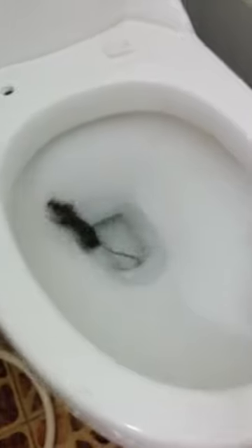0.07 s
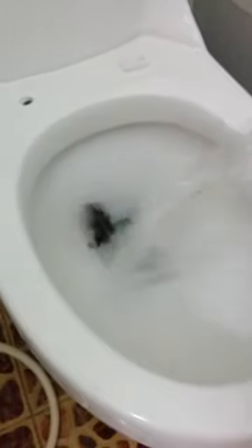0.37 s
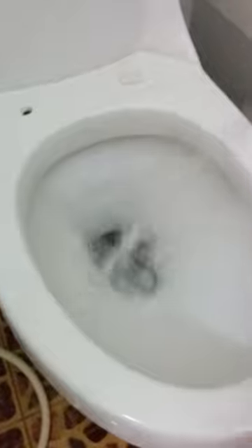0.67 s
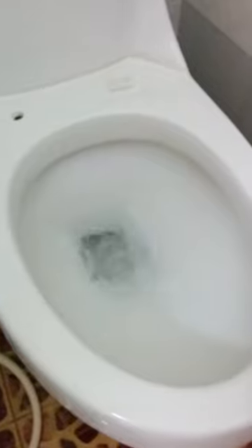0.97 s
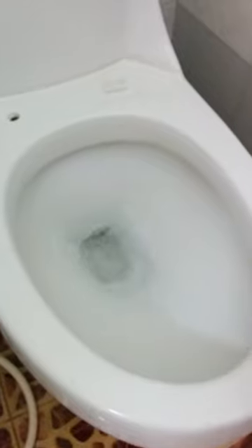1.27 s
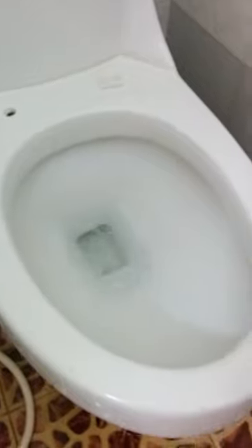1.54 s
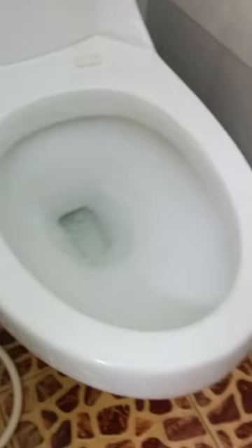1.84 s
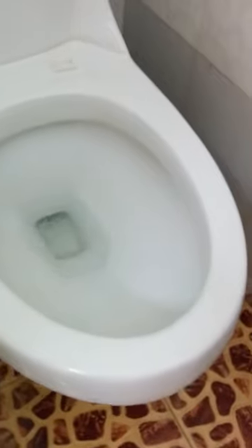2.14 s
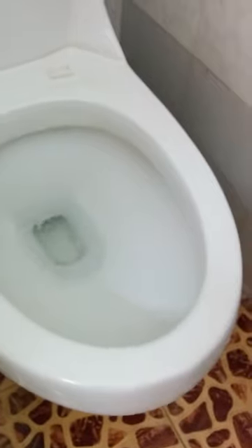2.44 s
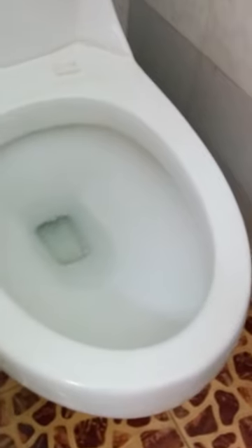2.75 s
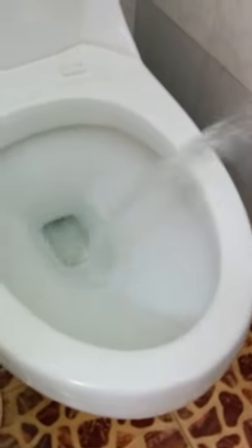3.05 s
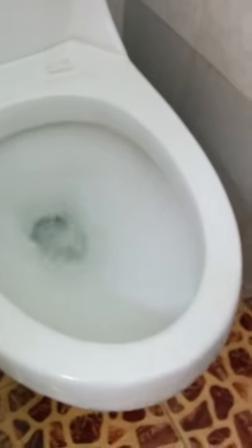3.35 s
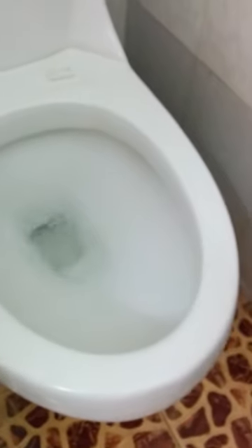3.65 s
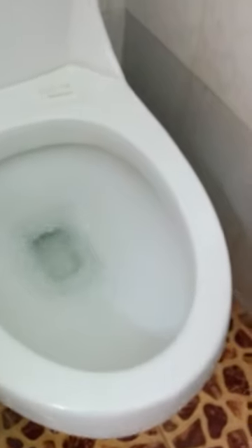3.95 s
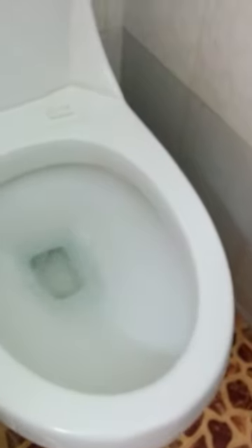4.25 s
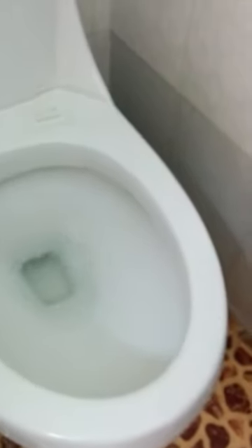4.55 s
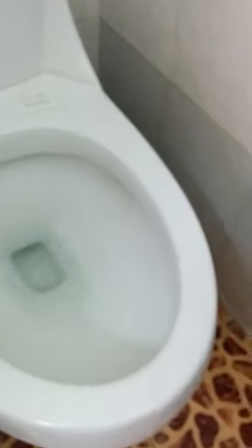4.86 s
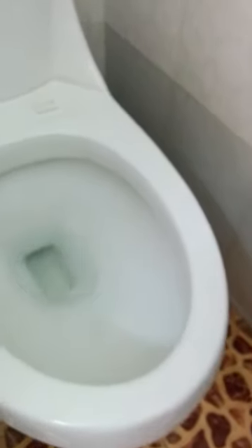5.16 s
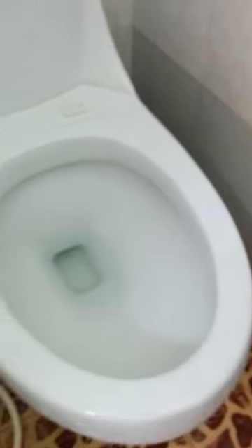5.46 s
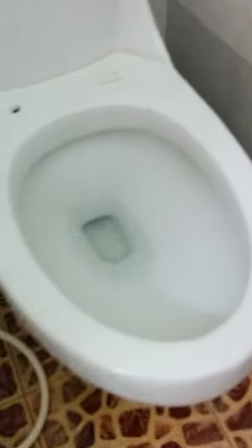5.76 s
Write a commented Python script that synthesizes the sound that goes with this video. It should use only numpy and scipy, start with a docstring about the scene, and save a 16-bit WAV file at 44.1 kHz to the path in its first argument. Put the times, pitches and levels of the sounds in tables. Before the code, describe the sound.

Two splashes of water gurgle down a toilet bowl in a tiled bathroom before a plastic bucket squeaks, falls and clatters.

```python
"""Water thrown twice from a plastic bucket into a toilet bowl; the trap gurgles and drips after each pour.
The water is heard as swarms of ringing bubbles, with spray ticking on the porcelain. The bucket's handle
squeaks and scrapes in its lugs; then the bucket is dropped, knocks a few times and lands with a hollow
clatter. Small tiled bathroom, one hand-held mono microphone in the room with the bowl: it takes in
the ring of the tiles and adds a soft low rumble as it is moved about."""
import sys
import numpy as np
from scipy import signal
from scipy.fft import rfft, irfft, next_fast_len
from scipy.io import wavfile
from scipy.ndimage import uniform_filter1d, map_coordinates

SR = 44100
rng = np.random.default_rng(int(sys.argv[2]) if len(sys.argv) > 2 else 0)


def output_pcm(signal):
    """Save a mono or channel-first signal as 16-bit PCM at the path in sys.argv[1].

    Samples are clipped to [-1, 1] before scaling.
    """
    pcm = np.clip(np.atleast_2d(signal).T, -1, 1) * 32767
    wavfile.write(sys.argv[1], SR, np.round(pcm).astype(np.int16))


N = 265482

# reverberation of the tiled room: f/Hz, t60/s
TILE_DECAY = [(100, 1.2), (200, 1.0), (500, 0.87), (1500, .6), (3000, .58), (6000, 0.44), (14000, 0.21)]
# spectra of the room tone and of the microphone's rumble: f/Hz, level/dB
ROOM_TONE_COLOUR = [(60, -23.5), (120, -21), (180, -4.5), (260, -7), (400, -13.5), (750, -10.5),
                    (1500, -20.5), (3000, -21.5), (4500, -29), (10000, -28.5), (16000, -34.5)]
RUMBLE_COLOUR = [(20, -29.5), (35, -27), (52, -17), (68, -0.5), (90, -18), (130, -20), (200, -33.5),
                 (400, -72.5)]
# bumps of the hand-held microphone: t/s, level/dB, half-width/s
MIC_BUMPS = [(.1, -72, .1), (.84, -50, .085), (1.53, -52, 0.043), (1.7, -66.5, .04), (2.02, -50, .055),
             (3.33, -64, .04), (3.52, -59.5, .07), (4.58, -62.5, 0.064), (4.86, -57, 0.041),
             (5.03, -43.5, 0.042), (5.23, -47, 0.043), (5.45, -59.5, .13)]
# drops on the porcelain: t/s, level/dB, f/Hz
DROPS = [(.131, -51, 1200), (.138, -45, 9450), (.21, -46, 11200), (1.229, -27, 9700), (1.39, -51, 11100),
         (1.503, -49, 9000), (1.8, -59, 9064), (2.875, -58.5, 7480), (3.222, -36.5, 12500),
         (3.329, -21.5, 10000), (.464, -32, 10500), (.738, -21, 11500), (.857, -19, 10490),
         (3.662, -31.5, 11000), (3.915, -53, 10450), (4.145, -52, 13900), (4.582, -55, 10870)]
# water settling in the trap: t/s, bubbling/dB, fizz/dB
SETTLING = [(.15, -83, -72), (1.28, -74, -66), (3.79, -64.5, -71.5)]
# spectra of the two pours, the second also of settling water: f/Hz, level/dB
FIRST_COLOUR = [(110, -54.5), (180, -15.5), (221, -25.5), (347, -12), (435, -16), (957, -19), (1070, -1.5),
                (1270, -11.5), (1920, -7), (2270, -6.5), (3070, -1), (4550, -4.5), (5380, -14.5),
                (11200, -13.5), (16000, -25.5)]
SECOND_COLOUR = [(110, -59.5), (180, -6.5), (288, -1), (404, -20), (487, -10), (779, -15), (1110, -0.5),
                 (1270, -16.5), (1370, -6), (1500, -10), (1850, -6.5), (4550, -7), (5490, -13.5),
                 (9280, -10), (16000, -21)]
# throws of water: t/s, rise/s, hold/s, plunge/dB, splash/dB, spray/dB
POURS = [(.458, 0.038, 0.5, -30, -23, -26), (3.213, 0.19, 0.23, -19.5, -16.5, -25)]
# each jet's way down: time to the wall/s, time to the trap/s, first low cut/Hz, last low cut/Hz
JET_PATHS = [(0.06, .134, 2700, 330), (.03, 0.1, 7900, 170)]
# slugs of water landing within a pour: t/s, plunge/dB, splash/dB, spray/dB
SLUGS = [(0.605, -39.5, -14, -24.5), (0.777, -47, -16.5, -27), (.842, -28, -28.5, -29),
         (.892, -41.5, -26.5, -44), (.962, -62, -41, -29), (1.14, -48, -35, -45), (3.292, -40, -23, -29),
         (3.322, -24.5, -15.5, -22.5), (3.403, -41.5, -27.5, -20.5), (3.553, -40, -27, -34),
         (3.642, -45.5, -32.5, -62), (3.664, -63, -57, -46)]
# the bowl's lingering ring: f/Hz, width/Hz, level/dB
BOWL_MODES = [(261, 2.4, 2.5), (1110, 2.7, -9.5)]
# gulps of air in the trap: t/s, level/dB, f/Hz
GULPS = [(.592, -6, 1876), (.612, -5, 3070), (.645, -7.5, 1930), (1.145, -29, 1355), (1.21, -28.5, 1180),
         (1.229, -31, 4020), (1.33, -26, 2087), (1.331, -34.5, 3250), (1.34, -42, 1000),
         (1.345, -46.5, 2140), (1.39, -53, 4030), (1.502, -22, 2280), (1.503, -36, 4070), (1.504, -50, 741),
         (1.518, -23, 2630), (1.545, -29, 2210), (3.251, -27, 3080), (3.295, -16.5, 1100),
         (3.647, -19.5, 2440), (2.835, -58, 3600), (3.815, -45, 3040), (3.865, -56, 4010),
         (3.98, -55, 3724), (4.025, -54.5, 3390), (4.13, -61, 4200)]
# the handle rubbing in its lugs: t/s, length/s, ringing/dB, scraping/dB
HANDLE_RUBS = [(1.641, .2, -77, -95), (4.217, 0.06, -43, -50), (4.242, 0.1, -46, -61),
               (4.358, 0.022, -69, -53)]
# resonances of the handle as it rubs and as it squeaks: f/Hz, level/dB
HANDLE_MODES = [(2595, -53.5), (3203, -57), (3300, -68), (3359, -45), (3424, -66), (3531, -49.5),
                (3644, -56), (3994, -54), (4570, -54.5), (9243, -68)]
SQUEAK_MODES = [(2665, -13.5), (3058, -19), (3424, -20.5)]
# spectra of the handle's scrape, the bucket's rustle and its wall's clack: f/Hz, level/dB
SCRAPE_COLOUR = [(180, -65), (400, -17.5), (660, -2.5), (850, -14), (1150, 0.5), (1330, -10), (1520, 2),
                 (1800, -13), (2000, -4), (2250, -13), (2520, 5), (2870, -14), (3440, -7), (5620, -16),
                 (9490, -15.5), (15000, -24)]
RUSTLE_COLOUR = [(250, -39), (550, -0.5), (1200, -11), (1700, -8.5), (3000, -38.5)]
CLACK_COLOUR = [(410, -28.5), (640, -4), (780, -7.5), (934, -4), (1010, -5), (1350, -0.5), (1600, -9),
                (1820, -6.5), (2130, -6.5), (3070, -2), (4100, -11.5), (4860, -12.5), (5840, -21.5),
                (8880, -19.5), (13700, -26), (16000, -40.5)]
# the bucket being moved about: t/s, length/s, squeak/dB, rustle/dB
SWINGS = [(2.981, .23, -63.5, -69.5), (4.39, 0.065, -76, -64.5), (4.765, 0.083, -80.5, -63.5)]
# blows on the bucket: t/s, clack/dB, clack cut-off/Hz, boom/dB, boom centre/Hz, rattle t60/s
BLOWS = [(4.837, -26.5, 10500, -29, 950, 0.04), (4.951, -34.5, 2700, -40, 915, 0.023),
         (5.018, -33, 4400, -25.5, 431, 0.081), (5.175, -17, 20170, -16, 455.5, 0.07),
         (5.21, -18.5, 18100, -22.5, 470, 0.18), (5.24, -20, 12800, -19, 500, 0.18),
         (5.285, -20, 13600, -15, 580, 0.086), (5.35, -25.5, 9000, -20.5, 482, 0.17),
         (5.441, -33, 3270, -25.5, 402, 0.15), (5.52, -50.5, 2600, -35.5, 535, 0.066),
         (5.586, -64.5, 2390, -56, 520, 0.044), (5.725, -76.5, 2030, -67, 230, .02),
         (5.767, -80.5, 2000, -65, 222, 0.0094)]
# resonances of the bucket and the air in it: f/Hz, width/Hz, level/dB
BUCKET_MODES = [(187.2, 6.8, -1), (204, 3.4, 10), (262, 6.8, 2), (289, 14, -2.5), (330.6, 4, -13),
                (427.3, 9, -2), (489.6, 15, 0), (538, 11, -7), (573, 5.9, 3.5), (626.5, 5.7, 1.5),
                (766, 5, -5.5), (808, 8.3, -5), (940, 5.8, 1), (985, 10, -5.5), (1303, 18, -4.5)]


def amp(db):
    """Decibels to gain."""
    return 10 ** (np.asarray(db) / 20)


def unit(x):
    """Scale to rms 1."""
    return x / np.sqrt(np.mean(x ** 2) + 1e-20)


def unit_hit(x):
    """Scale a hit to rms 1 over its first 50 ms."""
    return x / np.sqrt(np.mean(x[:SR // 20] ** 2) + 1e-20)


def along(points, hz):
    """Read (f/Hz, value) points on a log frequency axis."""
    f, values = np.transpose(points)
    return np.interp(np.log(hz + 1), np.log(f + 1), values)


def add(track, s, x):
    """Mix x into the track from time s."""
    part = track[max(0, round(s * SR)):][:len(x)]
    part += x[:len(part)]


def filtered(x, response):
    """Filter x by a function of frequency."""
    size = next_fast_len(len(x) + SR // 2)
    return irfft(rfft(x, size) * response(np.fft.rfftfreq(size, 1 / SR)), size)[:len(x)]


def noise(colour, size):
    """Coloured noise of rms 1."""
    return unit(filtered(rng.standard_normal(size), lambda hz: amp(along(colour, hz))))


def resonate(x, modes):
    """Pass x through (f/Hz, width/Hz, level/dB) resonances."""
    return filtered(x, lambda f: sum(amp(db) * 1j * f * width / (hz * hz - f * f + 1j * f * width)
                                     for hz, width, db in modes))


def room(x, wet_db, life=1):
    """Direct sound plus a tail off the tiles; life scales the decay time."""
    hz, t, spectra = signal.stft(rng.standard_normal(SR), SR, nperseg=256)
    t60 = life * along(TILE_DECAY, hz)[:, None]
    tail = signal.istft(spectra * amp(-60 * t / t60), SR, nperseg=256)[1]
    return x + amp(wet_db) * signal.fftconvolve(x, tail / np.linalg.norm(tail))[:len(x)]


def room_tone():
    """The bathroom's faint hiss, wavering in patches of time and frequency."""
    spectra = signal.stft(noise(ROOM_TONE_COLOUR, N), nperseg=1024)[2]
    patches = uniform_filter1d(rng.standard_normal(spectra.shape), size=8, axis=0)
    waver_db = 3 * unit(uniform_filter1d(patches, size=16, axis=1))
    return amp(-73.5) * unit(signal.istft(spectra * amp(waver_db), nperseg=1024)[1][:N])


def microphone_rumble(floor_db=-79):
    """Low handling noise that swells as the microphone is moved about."""
    t = np.arange(N) / SR
    bumps = sum(amp(db) / (1 + ((t - s) / width) ** 2) ** 1.3 for s, db, width in MIC_BUMPS)
    return np.hypot(amp(floor_db), bumps) * noise(RUMBLE_COLOUR, N)


def bubbles(starts, hz, strength, q, size, glide=.06):
    """Damped sines of quality factor q that glide upward as each bubble nears the surface."""
    t = np.arange(int(min(2 * q / hz.min(), 1 / 20) * SR)) / SR
    age = t * hz[:, None] / q
    phase = 2 * np.pi * q * age * (1 + glide * age / 2)
    rings = strength[:, None] * np.exp(-np.pi * age) * np.sin(phase)
    places = (starts[:, None] * SR).astype(int) + np.arange(len(t))
    return np.bincount(places.ravel(), rings.ravel(), size)[:size]


def plops(rows, count, scatter, q, length_s, wet_db, life):
    """Each row is a quick, fading cluster of bubbles around one pitch."""
    out, order = np.zeros(N), np.linspace(0, 1, count)
    for s, db, hz in rows:
        starts = length_s * order * (1 + rng.random(count)) / 2
        pitches = hz * np.exp(scatter * rng.uniform(-0.84, 1, count))
        cluster = bubbles(starts, pitches, np.exp(-order), q, size=SR // 2)
        low_cut = signal.butter(4, hz * 0.79, "highpass", fs=SR, output="sos")
        heard = room(signal.sosfilt(low_cut, cluster), wet_db, life)
        add(out, s, amp(db - 15.5) * unit_hit(heard))
    return out


def drips():
    """Drops tick on the porcelain and hardly ring."""
    return plops(DROPS, count=14, scatter=.3, q=3, length_s=.02, wet_db=5, life=.75)


def churn(t, colour, lo_hz, hi_hz, per_s, q, spread_db, wet_db=0):
    """An even swarm of bubbles in one range of sizes, ringing in the bowl and room; rms 1."""
    when, pitch, chance = rng.random((int(per_s * len(t) / SR), 3)).T
    hz = lo_hz * (hi_hz / lo_hz) ** pitch
    # most bubbles are faint, a few are strong; small ones are brief but sharp
    strength = hz * amp(spread_db * chance ** 2)
    swarm = bubbles(when * len(t) / SR, hz, strength, q, size=len(t))
    band = lambda f: 1 / np.sqrt((1 + (lo_hz / (f + 1)) ** 12) * (1 + (f / hi_hz) ** 24))
    return unit(filtered(room(swarm, wet_db), lambda f: amp(along(colour, f)) * band(f)))


def trickle(fade_db_per_s=35.5):
    """Small bubbles and bursting foam fade while the water in the trap settles."""
    out, t = np.zeros(N), np.arange(SR // 2) / SR
    for s, bubbling_db, fizz_db in SETTLING:
        bubbling = churn(t, SECOND_COLOUR, lo_hz=2270, hi_hz=5060, per_s=70, q=26, spread_db=9.5)
        fizz = churn(t, SECOND_COLOUR, lo_hz=7560, hi_hz=16110, per_s=500, q=6, spread_db=7.5)
        add(out, s, amp(-fade_db_per_s * t) * (amp(bubbling_db) * bubbling + amp(fizz_db) * fizz))
    return out


def drained_db(empty_s):
    """Loss of level once the bucket is empty: the flow dies away ever faster."""
    empty_s = np.maximum(empty_s, 0)
    return 79.5 * empty_s + 102 * empty_s ** 2


def flow(t, start, rise_s, hold_s, levels_db, slug_rise_s=0.0095, slug_fall_db_per_s=193):
    """Gains of plunge, splash and spray: a throw swells, holds and drains; slugs land on top."""
    splash_loss = drained_db(t - hold_s)
    # the thinning jet stops plunging early, and the filling bowl cushions it
    plunge_loss = drained_db(t - hold_s + 0.065) + 11.5 * np.minimum(t, hold_s)
    spray_loss = 1.3 * splash_loss
    gains = amp(np.array(levels_db)[:, None] - np.array([plunge_loss, splash_loss, spray_loss]))
    power = ((1 - np.exp(-t / rise_s)) * gains) ** 2
    for s, *slug_db in SLUGS:
        age = np.maximum(start + t - s, 0)
        landing = (1 - np.exp(-age / slug_rise_s)) * amp(2 - slug_fall_db_per_s * age)
        power += np.outer(amp(slug_db), landing) ** 2
    return np.sqrt(power)


def spatter(t, depth_db=0.93, per_s=74):
    """A quick random gain: the water lands in uneven lumps."""
    knots = rng.standard_normal(len(t) // 100)
    return amp(depth_db * map_coordinates(knots, [t * per_s], mode="mirror"))


def jet_descent(water, wall_s, trap_s, first_hz, deepest_hz, break_s=.008):
    """Spray first, then the jet runs down the wall into the trap: the largest bubbles keep growing."""
    hz, t, spectra = signal.stft(water, SR, nperseg=512, noverlap=448)
    stages_s = [wall_s - break_s, wall_s, trap_s - break_s, trap_s]
    stages_hz = [first_hz, 1400, 880, deepest_hz]  # spray, high on the wall, low on the wall, trap
    lowest_hz = np.exp(np.interp(t, stages_s, np.log(stages_hz)))
    low_cut = 1 / np.sqrt(1 + (lowest_hz / (hz[:, None] + 1)) ** 9)
    return signal.istft(spectra * low_cut, SR, nperseg=512, noverlap=448)[1]


def pours():
    """Each throw sprays on the porcelain, splashes into the trap and plunges deep; the bowl rings."""
    out, t = np.zeros(N), np.arange(SR + SR // 4) / SR
    colours = FIRST_COLOUR, SECOND_COLOUR
    for (start, rise_s, hold_s, *levels_db), path, colour in zip(POURS, JET_PATHS, colours):
        plunge, splash, spray = flow(t, start, rise_s, hold_s, levels_db)
        gurgle = churn(t, colour, lo_hz=230.4, hi_hz=1001, per_s=530, q=13, spread_db=12, wet_db=2)
        froth = churn(t, colour, lo_hz=1032, hi_hz=5320, per_s=1500, q=24, spread_db=16.5, wet_db=1)
        # fine droplets only tick; a few heavy drops crack through them
        ticks = churn(t, colour, lo_hz=5000, hi_hz=16000, per_s=12000, q=3, spread_db=20, wet_db=-9)
        cracks = churn(t, colour, lo_hz=4000, hi_hz=14500, per_s=55, q=7, spread_db=12, wet_db=-7)
        water = spatter(t) * (plunge * gurgle + splash * froth)
        droplets = spray * (amp(-0.9) * ticks + amp(-7) * cracks)
        add(out, start, jet_descent(water + droplets, *path))
    return out + amp(-4.5) * resonate(out, BOWL_MODES)


def gulps():
    """Air gulps through the trap in clusters of ringing bubbles."""
    return plops(GULPS, count=12, scatter=0.17, q=31, length_s=.024, wet_db=2, life=0.33)


def stroke(s, length, rise_s, fall_db_per_s):
    """Gain that rises from time s, holds for its length and dies away."""
    age = np.maximum(np.arange(N) / SR - s, 0)
    return (1 - np.exp(-age / rise_s)) * amp(-fall_db_per_s * np.maximum(age - length, 0))


def ringing(modes, width_hz):
    """Rubbing keeps narrow resonances sounding; rms 1."""
    response = lambda f: sum(amp(db) / (1 + 2j * (f - hz) / width_hz) ** 2 for hz, db in modes)
    return unit(filtered(rng.standard_normal(N), response))


def handle_rub():
    """The handle rings and scrapes in its lugs as the bucket comes down after a throw."""
    ring = scrape = 0
    for s, length, ring_db, scrape_db in HANDLE_RUBS:
        rub = stroke(s, length, rise_s=0.016, fall_db_per_s=197)
        ring = np.hypot(ring, amp(ring_db) * rub)
        scrape = np.hypot(scrape, amp(scrape_db) * rub)
    slips = rng.standard_normal(N) * (rng.random(N) < 400 / SR)  # about 400 tiny slips a second
    rasp = unit(filtered(room(slips, wet_db=8), lambda hz: amp(along(SCRAPE_COLOUR, hz))))
    return ring * ringing(HANDLE_MODES, width_hz=72) + (scrape + ring * amp(-14.5)) * rasp


def bucket_swing():
    """The handle squeaks and the bucket rustles as it is swung and lowered."""
    squeak, rustle = ringing(SQUEAK_MODES, width_hz=50), noise(RUSTLE_COLOUR, N)
    out = np.zeros(N)
    for s, length, squeak_db, rustle_db in SWINGS:
        motion = stroke(s, length, rise_s=.05, fall_db_per_s=150.5)
        out += motion * (amp(squeak_db) * squeak + amp(rustle_db) * rustle)
    return out


def bucket_drop():
    """Every blow is a short rattle of the plastic wall and a boom of the hollow body."""
    out, t = np.zeros(N), np.arange(SR) / SR
    hollow = signal.butter(5, [160, 1800], "bandpass", fs=SR, output="sos")
    for s, clack_db, cutoff_hz, boom_db, centre_hz, t60 in BLOWS:
        force = amp(-60 * t / t60)
        # a softer contact gives a duller clack
        wall = unit(filtered(noise(CLACK_COLOUR, SR), lambda hz: 1 / np.hypot(1, (hz / cutoff_hz) ** 2)))
        clack = room(force * wall, wet_db=11.5, life=0.59)
        # the place that is struck decides which of the body's modes answer
        push = resonate(force * rng.standard_normal(SR), [(centre_hz, 0.76 * centre_hz, 0), (190, 60, -13)])
        body = resonate(push, BUCKET_MODES) + amp(-23) * room(push, wet_db=9.5, life=0.49)
        boom = signal.sosfilt(hollow, body)
        add(out, s, amp(clack_db) * unit_hit(clack) + amp(boom_db) * unit_hit(boom))
    return out


def scene():
    """All sources reach one microphone, fed to both channels."""
    water = gulps() + drips() + pours() + trickle()
    bucket = bucket_swing() + handle_rub() + bucket_drop()
    mono = water + bucket + room_tone() + microphone_rumble()
    return np.array([mono, mono])


def suppress(x, threshold_db, depth_db):
    """Noise suppression: bands below a sloping threshold are turned down, at most by depth_db."""
    hz, _, spectra = signal.stft(x, SR, nperseg=512, scaling="psd")
    power = uniform_filter1d(np.abs(spectra) ** 2, size=5, axis=1)
    power = uniform_filter1d(power, size=3, axis=2)
    threshold = amp(threshold_db - 2.6 * np.log2((hz[:, None] + 100) / 1000)) ** 2
    opening = power ** 2 / (power ** 2 + threshold ** 2)
    return signal.istft(spectra * amp(depth_db * (1 - opening)), SR, nperseg=512, scaling="psd")[1][:, :N]


def record(dry):
    """The recorder turns faint noise down a touch, rounds off the peaks and cuts the top treble."""
    ceiling, top_hz = .7, 16000
    clean = suppress(dry, threshold_db=-94, depth_db=-0.5)
    rounded = clean / (1 + np.abs(clean / ceiling) ** 6) ** (1 / 6)
    return np.array([filtered(x, lambda hz: 1 / (1 + (hz / top_hz) ** 250)) for x in rounded])


dry = scene()
out = record(dry)
output_pcm(out)
```